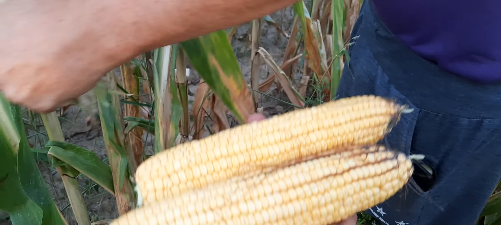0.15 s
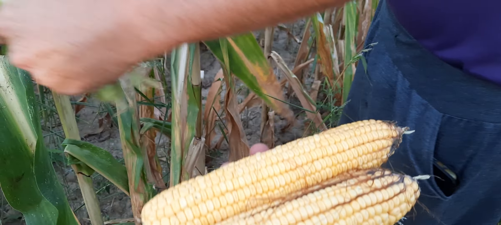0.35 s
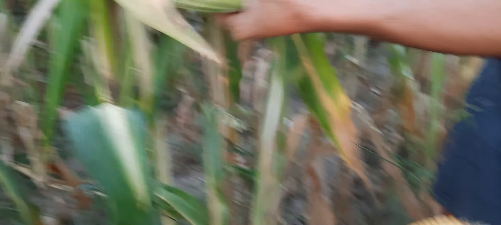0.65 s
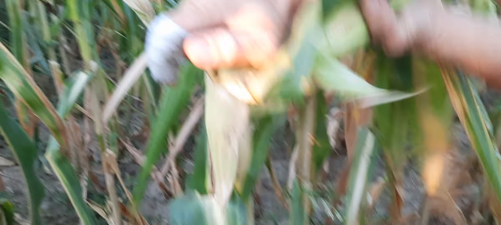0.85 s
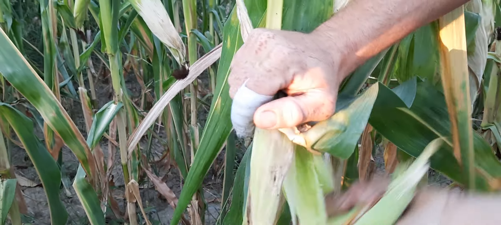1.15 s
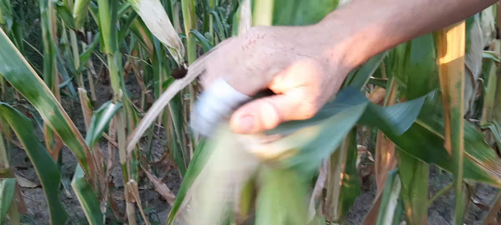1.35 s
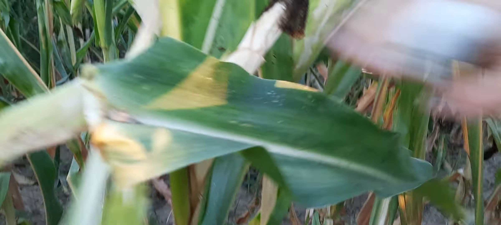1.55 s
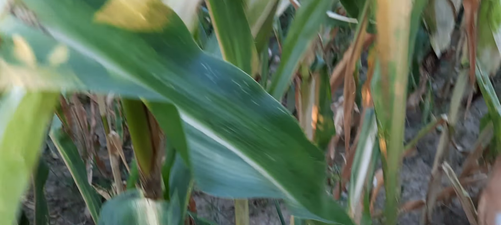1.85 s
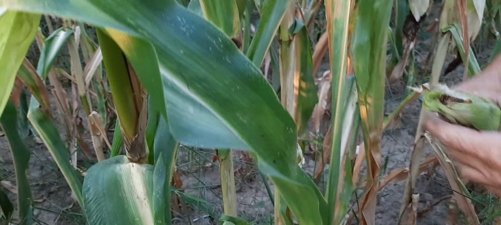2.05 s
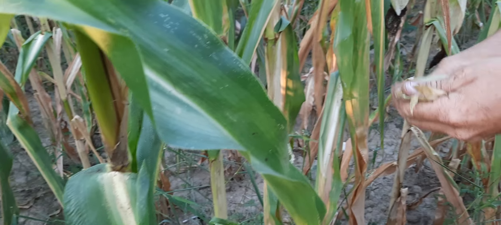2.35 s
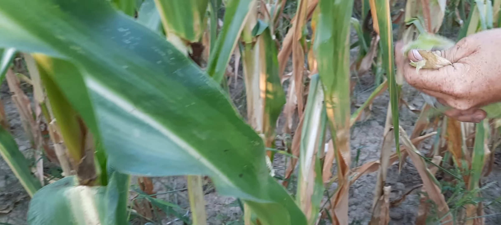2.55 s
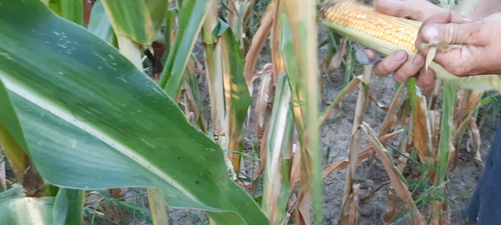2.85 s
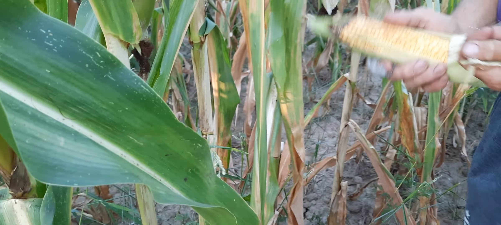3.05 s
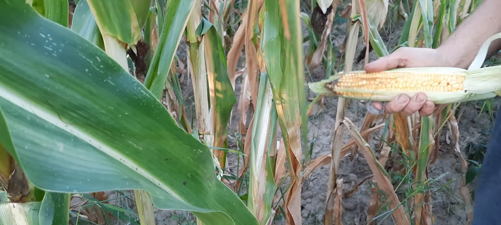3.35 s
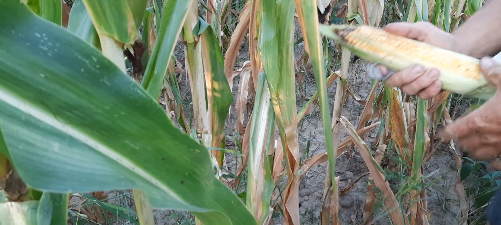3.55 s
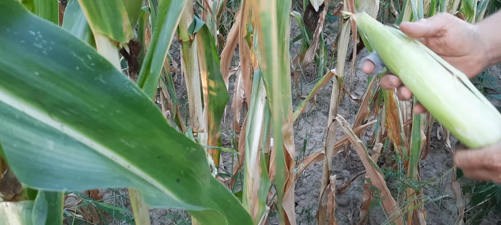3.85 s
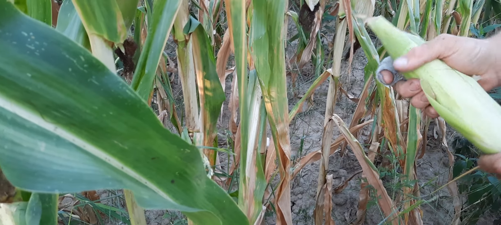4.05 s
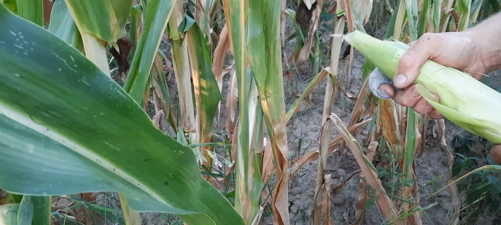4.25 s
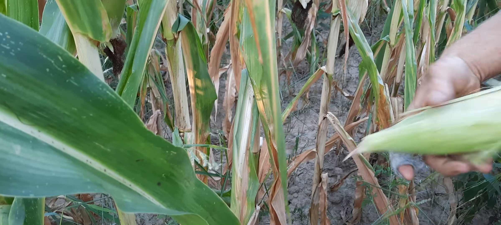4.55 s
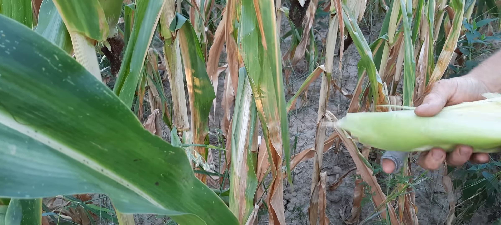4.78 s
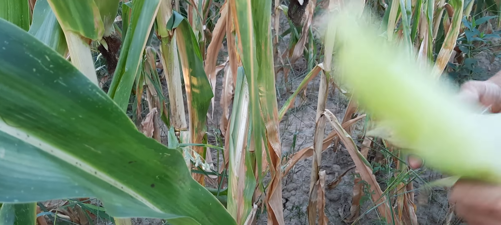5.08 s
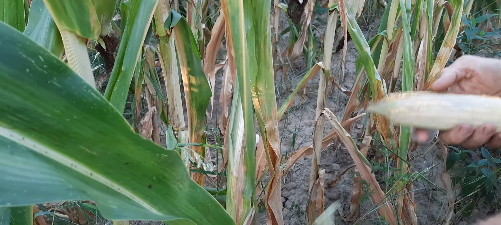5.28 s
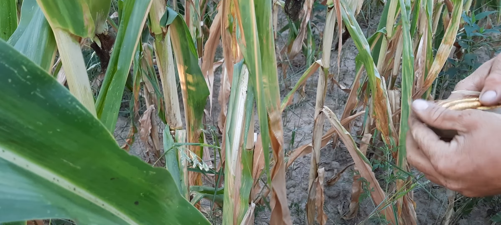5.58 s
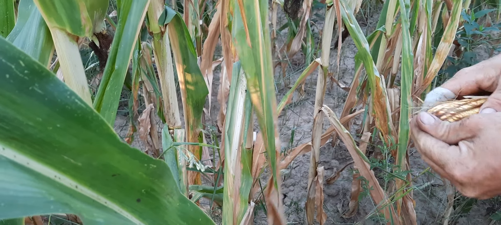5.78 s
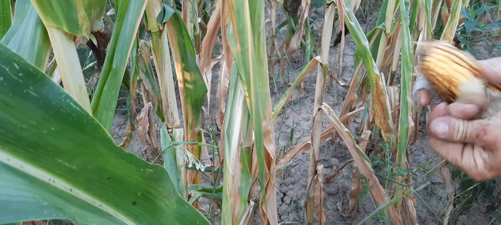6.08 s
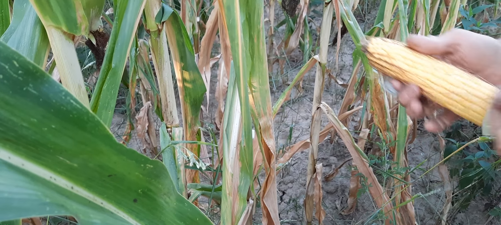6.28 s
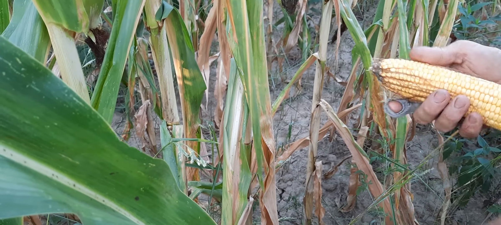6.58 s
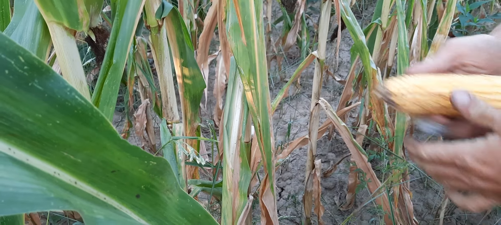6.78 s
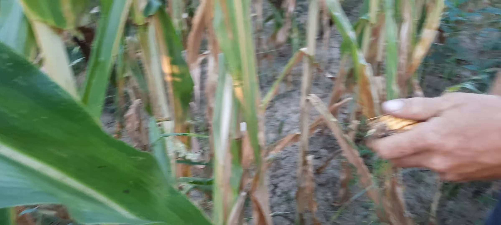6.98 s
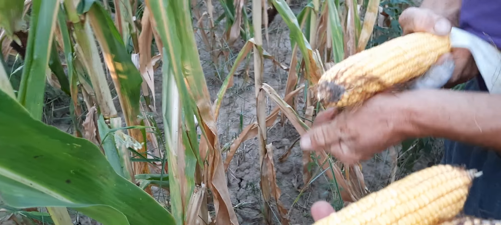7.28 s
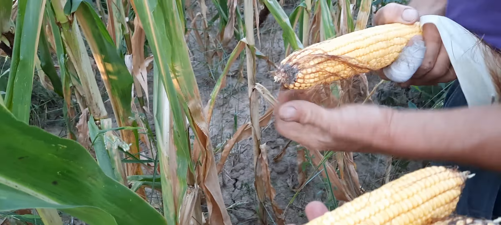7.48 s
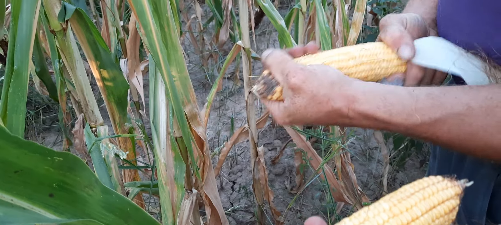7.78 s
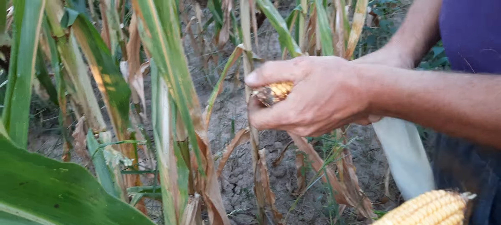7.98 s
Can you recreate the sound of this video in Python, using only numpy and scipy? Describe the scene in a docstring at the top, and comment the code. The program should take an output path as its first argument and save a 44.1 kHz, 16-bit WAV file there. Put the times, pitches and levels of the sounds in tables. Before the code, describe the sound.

Heard close, in dry open air with wide stereo detail. From 0 to 0.45 s, light dry leaf rustle with small brittle ticks. At about 0.5 to 0.75 s comes a violent burst of woody cracks and splintering, the loudest moment, slightly overloaded, with hollow knocks near 0.75 to 0.8 s. Leaves then crumple and swish heavily until about 1.7 s with a few duller snaps and soft thumps, thinning to faint rustle by 2 s. Around 2.9 to 3.35 s a husk rips with a short, uneven squeak and crisp pops. Quiet rubbing follows, then a sharp bright crack at 4.35 s. A snap at 4.95 s and papery tearing with fine ticks at 5.3 to 5.8 s lead to sparse crackles, a clear snap at 6.4 s, a tick near 7 s, then barely audible fiddling over faint air until 8.1 s.

```python
"""Husking maize by hand

Ears of maize are pulled from the stalk and husked in a field, an arm's length from two microphones.
Dry leaves and husks rustle as swarms of tiny cracks, each a short puff of noise with a pitch of its leaf.
The shank and single fibres snap as noise bursts that ring, and soft blows of the ear give dull knocks.
A tight husk squeaks as uneven slips over the kernels set it ringing; a faint outdoor murmur lies below.
"""
import sys
import numpy as np
from scipy import signal
from scipy.fft import rfft, irfft
from scipy.io import wavfile

SR = 44100
rng = np.random.default_rng(int(sys.argv[2]) if len(sys.argv) > 2 else 0)


def wav_out(sig):
    """Save sig, one row per channel (or a flat mono array), as 16-bit PCM at SR to the path in sys.argv[1]."""
    wavfile.write(sys.argv[1], SR, np.round(np.clip(np.atleast_2d(sig).T, -1, 1) * 32767).astype(np.int16))


N = 358511   # length in samples


def from_db(db):
    """Turn decibels into a factor."""
    return 10 ** (np.asarray(db) / 20)


def rms_one(x):
    """Scale a sound to an average (RMS) level of 1."""
    return x / np.sqrt(np.mean(x ** 2) + 1e-20)


def in_time(rows):
    """Draw straight lines between rows that start with a time in seconds; one curve per further column."""
    seconds, *columns = np.transpose(rows)
    return [np.interp(np.arange(N) / SR, seconds, column) for column in columns]


def drift(rate_hz):
    """Random wandering of spread 1: noise smoothed so that it changes about as fast as the rate."""
    r = np.exp(-2 * np.pi * rate_hz / SR)
    noise = rng.standard_normal(N + SR)
    smooth = signal.lfilter([1], [1, -2 * r, r * r], noise)
    return rms_one(smooth[SR:])   # the first second lets the filter settle


def colour(x, spectrum, size=4096):
    """Give a sound the wanted spectrum with a filter that never rings ahead of time (minimum phase)."""
    hz, db = np.transpose(spectrum)
    grid_hz = np.maximum(np.arange(size // 2 + 1) * SR / size, 10)
    gain = from_db(np.interp(np.log(grid_hz), np.log(hz), db))
    # folding the cepstrum onto positive times makes the filter minimum-phase
    cepstrum = irfft(np.log(gain))
    cepstrum[1:size // 2] *= 2
    cepstrum[size // 2 + 1:] = 0
    response = irfft(np.exp(rfft(cepstrum)))
    return signal.oaconvolve(x, response[None], axes=1)[:, :N]


def edge(x, hz, kind):
    """Gentle cut: "low" keeps what lies below the frequency, "high" what lies above."""
    return signal.sosfilt(signal.butter(2, hz, kind, fs=SR, output="sos"), x)


def resonance(x, hz, width_hz):
    """A body that rings at one pitch; the narrower the width, the longer it rings."""
    r = np.exp(-np.pi * width_hz / SR)
    top = [(1 - r * r) / 2, 0, (r * r - 1) / 2]
    return signal.lfilter(top, [1, -2 * r * np.cos(2 * np.pi * hz / SR), r * r], x)


def burst(t60, size):
    """A puff of noise for two microphones that dies by 60 dB in t60 seconds; its lows are more alike."""
    alike_below_hz, alike_bass, alike_treble = 1374, 0.87, 0.069   # shares of the power, 0 to 1
    shared, *own = rng.standard_normal((3, size)) * from_db(-60 * np.arange(size) / SR / t60)
    own = np.array(own)
    lows = np.sqrt(alike_bass) * shared + np.sqrt(1 - alike_bass) * own
    highs = np.sqrt(alike_treble) * shared + np.sqrt(1 - alike_treble) * own
    return edge(lows, alike_below_hz, "low") + edge(highs, alike_below_hz, "high")


def crackle(per_s, uneven_db, clump_db, t60, low_hz, high_hz, count):
    """Fibres crack at random, in clumps, on several leaves that each have a burst and a pitch of their own."""
    leaf_ring_db, leaf_ring_sharpness = 6.5, 5.0   # strength of the pitch; pitch divided by its width
    sizes = from_db(uneven_db * np.minimum(rng.exponential(1, N), 5)) * rng.choice([-1, 1], N)
    happens = rng.random(N) < per_s / SR
    cracks = sizes * happens * from_db(clump_db * drift(24))
    leaf = rng.integers(0, count, N)   # which leaf each crack belongs to
    out = 0
    for k, hz in enumerate(np.geomspace(low_hz, high_hz, count)):
        puff = burst(t60, size=1024)
        puff = puff + from_db(leaf_ring_db) * resonance(puff, hz, hz / leaf_ring_sharpness)
        leaf_cracks = cracks * (leaf == k) * from_db(2.2 * drift(9))
        out = out + signal.oaconvolve([leaf_cracks], puff, axes=1)[:, :N]
    return out


def rustle():
    """Fine cracks give the hiss, whole leaves buckling the crumple, stalks and ears rubbing a dull rumble."""
    # Spectra of the three layers. Each row: frequency in Hz, relative level per Hz in dB.
    fine_spectrum = [(300, -29), (1000, -25), (2000, -2.5), (4200, 2), (6500, 0), (11000, -9),
                     (17000, -4.5)]
    coarse_spectrum = [(200, -30.5), (500, -6), (900, -0.5), (1900, 5), (3500, -5), (9000, -30.5)]
    rumble_spectrum = [(30, -28), (80, -11), (215, -10), (320, -4.5), (700, -11.5), (2000, -44.5)]
    # Topmost treble of the fine crackle. Each row: time in seconds, gain in dB.
    treble_course = [(0, -3.5), (.9, -6.5), (1.4, -4.5), (1.8, -1.5), (3.0, -12), (3.6, -3), (4.5, -5),
                     (5.3, -1), (5.7, -1.5), (7.1, 7), (7.6, -9.5), (8.13, 10)]
    treble_hz = 9900
    fine_gain, coarse_gain, rumble_gain = handling()
    fine = rms_one(colour(crackle(5000, 2.9, 1.4, 0.012, 2000, 9000, count=15), fine_spectrum))
    treble_gain = from_db(in_time(treble_course)[0])
    # the minus sign keeps the two halves from cancelling where they meet
    fine = edge(fine, treble_hz, "low") - treble_gain * edge(fine, treble_hz, "high")
    coarse = rms_one(colour(crackle(3000, 2.1, 1.1, 0.016, 800, 3000, count=12), coarse_spectrum))
    rumble = rms_one(colour(crackle(1200, 2.0, 1.2, .015, 300, 600, count=6), rumble_spectrum))
    return fine_gain * fine + coarse_gain * coarse + rumble_gain * rumble


def handling():
    """Loudness of the three rustle layers: each stroke swells, holds and dies, on top of stirring leaves."""
    # Hand strokes through the husks. Each row: time of full strength in seconds, seconds to swell by
    # stroke_db, seconds held, seconds to die by stroke_db, fine crackle level in dB, then coarse
    # crumple and dull rumble in dB against the fine crackle.
    stroke_table = [(0.095, 0.027, 0.042, 0.017, -41.5, -4, -4.5),
                    (0.359, 0.023, 0.032, .1, -41.5, -7, -13),
                    (0.479, 0.025, 0.01, 0.076, -31.5, -5.5, -16.5),
                    (0.581, 0.0042, 0.006, 0.01, -21, -9.5, -31),
                    (0.631, 0.023, 0.0041, 0.014, -26, -9.5, -5),
                    (0.601, 0.085, 0.038, 0.03, -31.5, -2, -9),
                    (0.723, 0.004, 0.0028, 0.043, -26.5, 8, -10),
                    (0.795, 0.052, 0.037, 0.042, -27.5, -5.5, -13.5),
                    (0.895, 0.0083, 0.0077, 0.012, -32, -8, -10),
                    (1.094, 0.36, .002, 0.34, -32.5, -1, -13.5), (1.218, 0.063, 0.09, 0.18, -39, -9.5, -19),
                    (1.446, 0.16, 0.054, 0.16, -34, -3.5, -14.5),
                    (1.601, 0.044, 0.0018, 0.14, -37, -4, -28),
                    (1.849, 0.0042, 0.0044, 0.066, -39, -9, -66),
                    (1.959, 0.054, .002, 0.1, -41.5, -7.5, -39), (2.06, 0.17, 0.067, 0.18, -52.5, 5, -13),
                    (2.392, 0.1, 0.0065, 0.092, -45.5, -13, -40),
                    (2.605, 0.1, 0.0029, 0.1, -46.5, -5.5, -33),
                    (2.738, 0.003, 0.012, 0.056, -42.5, -9, -38),
                    (2.838, 0.046, 0.044, 0.1, -44.5, -12, -45),
                    (3.102, 0.087, 0.057, 0.049, -34.5, -1, -53),
                    (3.272, 0.086, 0.015, 0.063, -34, -0.5, -25.5),
                    (3.514, 0.26, 0.0045, 0.017, -50.5, -27, -29),
                    (3.561, 0.057, 0.013, 0.059, -50, -8, -32), (3.652, 0.01, 0.0086, 0.054, -58, 6, -2),
                    (3.78, 0.14, 0.022, 0.094, -41.5, -11.5, -26), (4.02, 0.26, 0.033, 0.038, -53, -2, -35),
                    (4.121, 0.0038, 0.0059, .015, -53.5, -3, -21),
                    (4.337, 0.0092, 0.0094, 0.025, -24, -16, -50),
                    (4.363, 0.0069, 0.018, 0.026, -29.5, -2.5, -19.5),
                    (4.615, 0.37, 0.0078, 0.089, -49.5, -8, -23),
                    (4.789, 0.025, .002, 0.086, -42, -7, -18.5), (4.901, 0.11, 0.029, .05, -47, 2.5, -20),
                    (4.956, 0.04, 0.0008, 0.051, -38, 0, -17), (5.221, 0.034, 0.0045, .029, -55, -24, -31),
                    (5.264, 0.02, 0.014, 0.015, -52, -26.5, -34), (5.37, 0.014, 0.092, .021, -35, -13, -30),
                    (5.564, 0.16, 0.033, 0.098, -31.5, -12.5, -29),
                    (5.823, 0.007, 0.0055, 0.014, -54, 4, -39),
                    (5.918, .009, 0.035, 0.049, -52.5, -29, -35),
                    (6.067, 0.051, 0.0058, 0.3, -48, -27, -21),
                    (6.187, 0.12, 0.0071, 0.054, -38.5, -10, -58),
                    (6.338, 0.026, 0.0066, 0.09, -54, -2.5, -21),
                    (6.413, 0.08, .002, 0.042, -49.5, -10, -8),
                    (6.525, .021, 0.053, 0.036, -50.5, -9.5, -9),
                    (6.934, 0.15, .014, 0.092, -59, -16, -22.5),
                    (6.99, 0.004, 0.0053, 0.083, -53.5, -11, -25),
                    (7.213, 0.14, 0.066, 0.11, -58, -16.5, -21), (7.276, 0.016, 0.008, 0.1, -66, 3.5, 1),
                    (7.5, 0.14, 0.0033, 0.41, -59, -10, -23), (7.692, 0.048, 0.075, .1, -53.5, -3.5, -35),
                    (7.751, 0.083, 0.0057, 0.13, -56.5, 9.5, -15),
                    (7.835, 0.056, 0.0086, .05, -59.5, 5.5, -23),
                    (7.903, 0.14, 0.041, 0.056, -55.5, -5, -12)]
    # Leaves stirring between the strokes. Each row: time in seconds, fine crackle level in dB.
    stir_course = [(0, -38.5), (.45, -47.5), (.7, -43), (.9, -41), (1.3, -48), (1.75, -46.5), (2.3, -53.5),
                   (3.0, -53), (3.4, -61), (4.3, -58.5), (4.7, -66), (5.14, -69.5), (5.7, -53), (6.0, -68),
                   (6.3, -55.5), (6.46, -75.5), (6.68, -75), (6.76, -92.5), (6.84, -71.5), (7.4, -83.5),
                   (8.13, -71)]
    stroke_db, shortest_swell_s, shortest_die_s = 20, .003, .004
    stir_layers_db = np.array([[0], [-4.5], [-18.5]])   # fine, coarse, rumble against the fine
    step = 32   # the curves are worked out at every 32nd sample
    t = np.arange(0, N, step) / SR
    stir_db = in_time(stir_course)[0][::step]
    power = from_db(2 * (stir_db + stir_layers_db))   # doubled dB: power
    for s, swell_s, hold_s, die_s, fine_db, coarse_db, rumble_db in stroke_table:
        before = (s - t) / max(swell_s, shortest_swell_s)
        after = (t - s - hold_s) / max(die_s, shortest_die_s)
        db = fine_db - stroke_db * np.maximum(0, np.maximum(before, after))
        power = power + from_db(2 * (db + np.array([[0], [coarse_db], [rumble_db]])))
    return [np.interp(np.arange(N) / SR, t, np.sqrt(p)) for p in power]


def snaps():
    """A dry tick, a sharp ringing crack, a thud of the ear, crisp treble and a tail scattered by the leaves."""
    # Each row: start in seconds, peak level of the crack in dB, ring in Hz, then the peaks of the
    # thud and of the crisp treble in dB against the crack.
    snap_table = [(0.039, -15, 6000, -32, 6), (0.043, -9, 2630, -17.5, 5.5), (0.17, -25, 6180, -22, -12),
                  (0.193, -24, 6500, -27, -16), (0.243, -26, 5600, -30, -13), (0.28, -18.5, 6300, -21, -19),
                  (0.421, -21.5, 2400, -10, 8), (0.477, -15.5, 5830, -27, -7), (0.534, -12, 4740, -26, -9),
                  (0.549, -1, 2500, -54, -11), (0.578, -19, 4530, -32, -14), (0.583, 0, 920, -33, -10.5),
                  (0.6, -2, 1000, -36, -4), (0.621, -6, 1020, -19, -14), (0.639, -3.5, 1110, -26, -24),
                  (0.671, 0, 1260, -26, -8), (0.717, -15, 7400, -16, -20), (0.723, -2, 1097, -15.5, -24),
                  (0.853, -11.5, 2550, -34, -15), (0.98, -18.5, 1800, -26, -18),
                  (1.16, -18, 1800, -26, -22), (1.231, -11, 2100, -15, -20), (1.848, -37, 6570, -39, -16),
                  (2.737, -33, 4840, -41, -12), (2.916, -22.5, 2620, -45, -14.5),
                  (3.288, -13, 3480, -40.5, -18), (3.301, -12.5, 4930, -31, -24),
                  (3.323, -10, 2700, -52, -3), (3.652, -43, 1700, -12, -22), (3.92, -35, 6200, -42.5, -23),
                  (4.032, -34.5, 1900, -33, -16), (4.208, -32.5, 3700, -47, -23),
                  (4.25, -37, 2140, -32.5, -15.5), (4.283, -32, 2330, -50, -13),
                  (4.335, -8, 6730, -55, -11), (4.347, -17, 4880, -50, -14), (4.36, -8.5, 5950, -16.5, -10),
                  (4.362, -7, 3900, -31, -15), (4.96, -17.5, 3800, -21, -16),
                  (5.221, -36.5, 2940, -39, -17), (5.263, -45.5, 4950, -34, -20.5),
                  (5.36, -28, 4740, -32, 7), (5.376, -27, 6030, -37, -16), (5.412, -33, 5530, -34, -17.5),
                  (5.55, -25.5, 4740, -40.5, -13.5), (5.585, -17, 4740, -40, -15),
                  (5.702, -25, 7580, -39, -13), (5.71, -23, 5890, -29, -23), (5.739, -26.5, 5550, -45, 2),
                  (5.743, -23.5, 5550, -36, -8.5), (5.767, -29, 1920, -38, -21),
                  (5.825, -26.5, 4030, -39.5, -8), (6.059, -28.5, 6150, -35.5, -10),
                  (6.118, -33.5, 4180, -30.5, -6), (6.288, -38, 4500, -25, -16),
                  (6.338, -23, 4180, -40, -13), (6.151, -39, 6890, -30, -11.5),
                  (6.176, -33, 4700, -31.5, -13), (6.408, -10, 6400, -28, 4), (6.55, -36, 4700, -12.5, -20),
                  (6.944, -38, 5430, -36.5, -18), (6.987, -27.5, 5000, -42, -21)]
    tail_t60, tick_db = 0.036, -7
    stalk_hz, stalk_width_hz = 343.3, 120   # hollow ring of the stalk under the thud
    # snaps that ring low are the woody shank, with a second ring
    shank_below_hz, shank_hz, shank_width_hz, shank_db = 1500, 2200, 520, 12
    size = 3072
    out = np.zeros((2, N + size))
    for s, peak_db, ring_hz, thud_db, crisp_db in snap_table:
        puff = burst(0.0076, size=size) + from_db(-3.0) * burst(tail_t60, size=size)
        puff[:, :2] += from_db(20) * np.array([1, -.25])   # the break itself
        crack = edge(puff, ring_hz / 2.5, "high")
        crack = edge(crack, min(2.5 * ring_hz, 8500), "low")
        crack = crack + from_db(23) * resonance(puff, ring_hz, width_hz=250 + 0.32 * ring_hz)
        if ring_hz < shank_below_hz:
            crack = crack + from_db(shank_db) * resonance(puff, shank_hz, shank_width_hz)
        tick = edge(burst(.003, size=size), 1500, "high")
        tick = edge(tick, min(4 * ring_hz, 9000), "low")
        thud = edge(puff, 1100, "low") + from_db(8) * resonance(puff, stalk_hz, stalk_width_hz)
        thud = edge(edge(thud, 270, "high"), 270, "high")
        crisp = edge(edge(puff, 9500, "high"), 9500, "high")
        layers = ((crack, 0), (tick, tick_db), (thud, thud_db), (crisp, crisp_db))
        snap = sum(from_db(db) * part / np.abs(part).max() for part, db in layers)
        at = round(s * SR)
        out[:, at:at + size] += from_db(peak_db) * snap
    return out[:, :N]


def knocks():
    """Ear against stalk or hand: a soft blow whose short puff is heard through the ring of the body struck."""
    # Each row: start in seconds, peak level in dB, ring in Hz, a decay time in seconds that sets the
    # puff's length and the ring's width.
    knock_table = [(0.12, -29, 950, 0.026), (0.74, -20, 1480, 0.05), (0.79, -10.5, 1490, 0.075),
                   (0.795, -20, 1470, .05), (0.995, -29, 336, 0.0086), (1.096, -23.5, 716, 0.016),
                   (1.105, -31, 785, 0.017), (1.141, -27, 760, 0.031), (1.22, -24, 830, 0.035),
                   (3.874, -37, 1800, .018), (4.023, -42, 1710, 0.13), (4.369, -23.5, 1025, 0.068),
                   (4.385, -33.5, 960, 0.029), (5.631, -19, 4480, 0.029), (5.633, -28.5, 1920, 0.034),
                   (5.76, -40, 2030, .03), (6.383, -41, 710, .03), (6.399, -38, 875, 0.029),
                   (7.224, -58.5, 2030, .02), (7.271, -40.5, 1380, 0.015), (7.273, -46, 2000, 0.017),
                   (7.27, -55.5, 330, 0.042), (7.641, -51, 1150, .025), (7.65, -47, 905, 0.012),
                   (7.876, -36, 990, 0.012), (7.882, -38, 1680, .014)]
    size = 3072
    out = np.zeros((2, N + size))
    for s, peak_db, ring_hz, t60 in knock_table:
        ring = resonance(burst(t60 / 2, size=size), ring_hz, width_hz=6.3 / t60)
        ring = resonance(ring, ring_hz, width_hz=0.59 * ring_hz)
        contact = resonance(burst(0.015, size=size), ring_hz, width_hz=ring_hz)
        knock = ring + from_db(-20.5) * contact
        at = round(s * SR)
        out[:, at:at + size] += from_db(peak_db) * knock / np.abs(knock).max()
    return out[:, :N]


def squeak():
    """Stick and slip: an unsteady, uneven train of slips sets the taut husk ringing."""
    # Each row: time in seconds, slips per second, level in dB, extra level of the overtones in dB.
    squeak_course = [(3.02, 420, -56, -7.5), (3.04, 610, -40, -13), (3.055, 580, -37, -11),
                     (3.076, 620, -31.5, -8), (3.088, 590, -49, -15), (3.096, 860, -51, -2),
                     (3.106, 990, -39, 2), (3.12, 950, -39.5, 1), (3.136, 880, -33, -2),
                     (3.152, 1000, -41, 4.5), (3.165, 1220, -40, 0), (3.18, 1080, -31, -17),
                     (3.192, 670, -48, -13)]
    # Resonances of the taut husk. Each row: frequency in Hz, width in Hz, level in dB.
    husk_rings = [(645, 920, 2.5), (1150, 1400, 3), (1920, 200, 7), (2480, 250, 3.5), (3220, 200, 4),
                  (4500, 1700, 0.5)]
    per_s, level_db, overtones_db = in_time(squeak_course)
    cycles = np.cumsum(per_s * (1 + .025 * drift(150))) / SR + .03 * drift(500)
    slip_now = np.diff(np.floor(cycles), prepend=0) > 0   # one slip at each whole cycle
    slips = slip_now * from_db(2.5 * drift(400))
    tone = 0
    for k, (hz, width_hz, gain_db) in enumerate(husk_rings):
        gain = from_db(gain_db + overtones_db * (k > 1))   # overtones: all but the two lowest rings
        tone = tone + (-1) ** k * gain * rms_one(resonance(slips, hz, width_hz))
    t = np.arange(N) / SR
    sounding = (t > squeak_course[0][0]) & (t < squeak_course[-1][0])
    return from_db(level_db) * sounding * rms_one(edge(tone, 810, "high"))


def field():
    """Faint far murmur of air and leaves: coloured noise, separate in each microphone, swaying a little."""
    # Each row: frequency in Hz, relative level per Hz in dB.
    field_spectrum = [(18, -36), (30, -16), (64, -17.5), (200, -27), (303, -27.5), (384, -24), (512, -24.5),
                      (702, -31), (3000, -46), (16000, -44.5)]
    murmur = rms_one(colour(rng.standard_normal((2, N)), field_spectrum))
    return from_db(-75 + 1.1 * drift(1.7)) * murmur


def scene():
    """The hands' place sets the delay and balance between the microphones; the field lies around them."""
    # Each row: time in seconds, samples by which the left microphone hears later, left minus right in dB.
    hand_course = [(0, -4, 2), (.7, -5, 2.5), (1.0, -4.5, 2), (2.7, -4, 2), (3.0, 10, 2.5), (5.1, 6, 0),
                   (5.3, 3.5, 1), (5.9, 6, 2.5), (6.05, 6.5, 1), (8.13, 8.5, 1.5)]
    lag, pan_db = in_time(hand_course)
    left, right = rustle() + snaps() + knocks() + squeak()
    left = np.interp(np.arange(N) - np.round(lag), np.arange(N), left)
    hands = np.array([left * from_db(pan_db / 2), right * from_db(-pan_db / 2)])
    return hands + field()


def record(dry):
    """A bass roll-off, peaks and dips of the microphone housing, clipping near full scale, a steep top cut."""
    # Peaks and dips of the housing. Each row: frequency in Hz, width in Hz, gain in dB.
    housing = [(311.6, 34, 2), (516, 170, -7.5), (1140, 170, 0), (1607, 130, -4.5), (2338, 280, 1.5),
               (9360, 2350, -9.5), (12400, 7000, 10)]
    top_cut_hz = 16575   # at least 70 dB down from here up
    x = edge(dry, 55, "high")
    for hz, width_hz, gain_db in housing:
        w = 2 * np.pi * hz / SR
        g = from_db(gain_db / 2)   # half above and half below the fraction line
        a = np.pi * width_hz / SR
        x = signal.lfilter([1 + a * g, -2 * np.cos(w), 1 - a * g], [1 + a / g, -2 * np.cos(w), 1 - a / g], x)
    clipped = np.clip(x, -.9, .9)
    return signal.sosfilt(signal.cheby2(16, 70, top_cut_hz, fs=SR, output="sos"), clipped)


dry = scene()
out = record(dry)
wav_out(out)
```